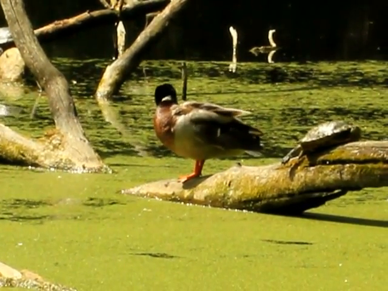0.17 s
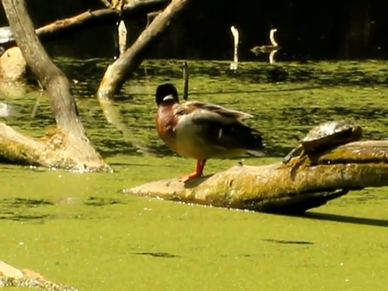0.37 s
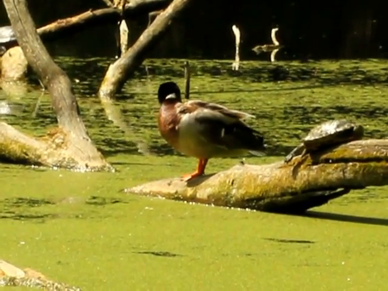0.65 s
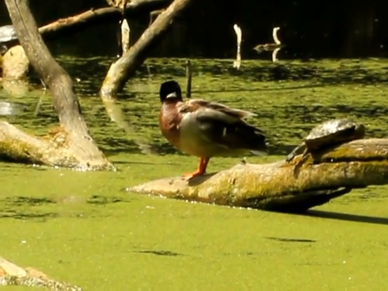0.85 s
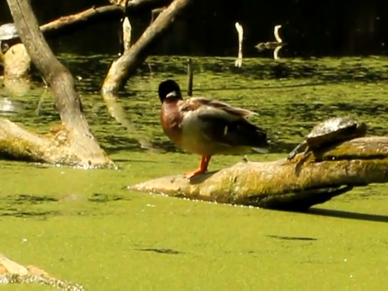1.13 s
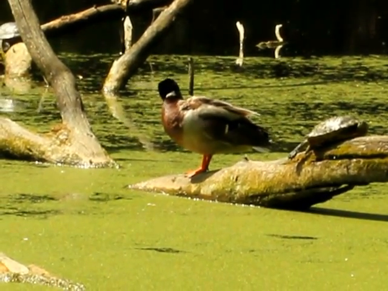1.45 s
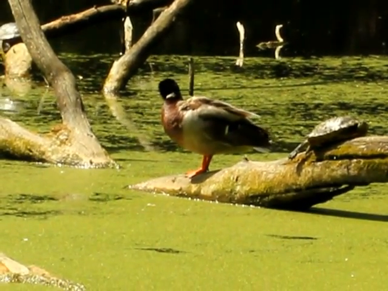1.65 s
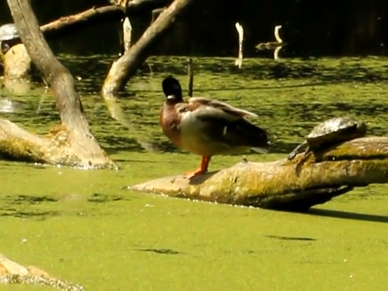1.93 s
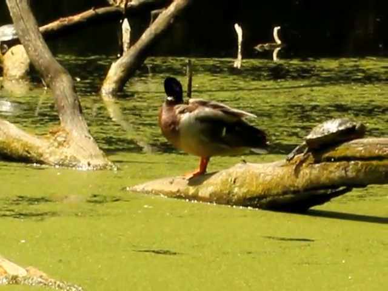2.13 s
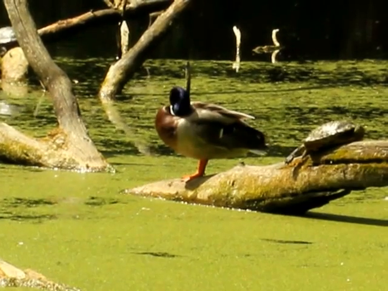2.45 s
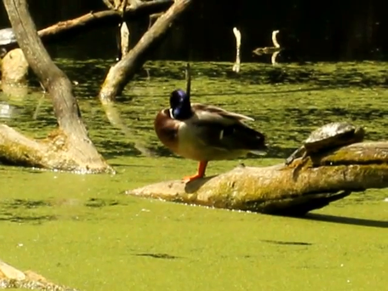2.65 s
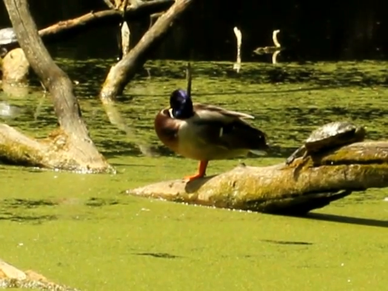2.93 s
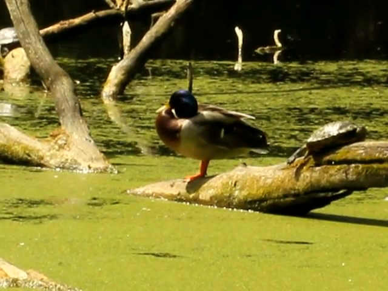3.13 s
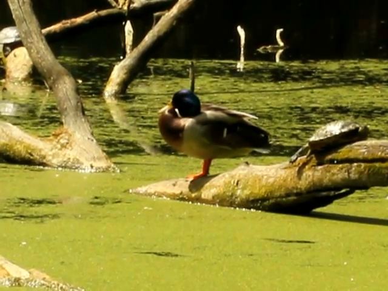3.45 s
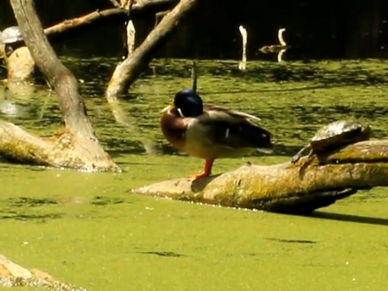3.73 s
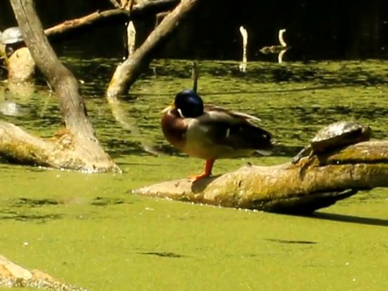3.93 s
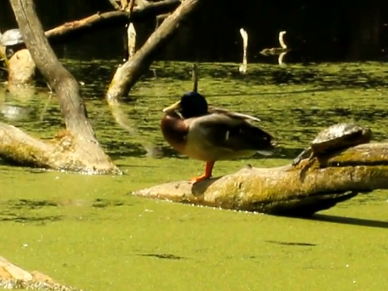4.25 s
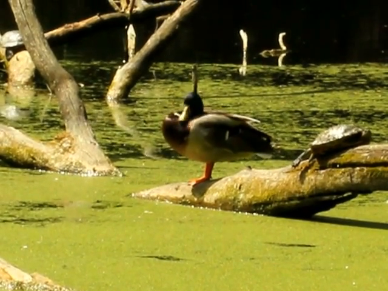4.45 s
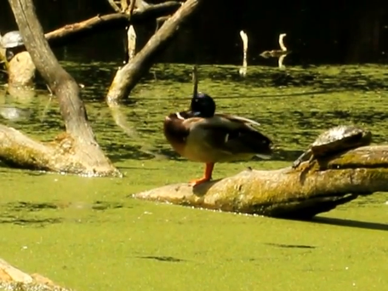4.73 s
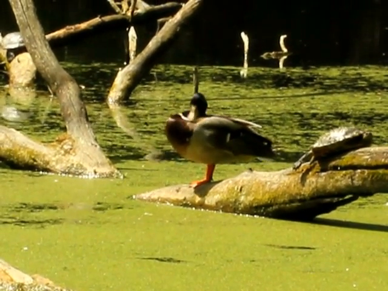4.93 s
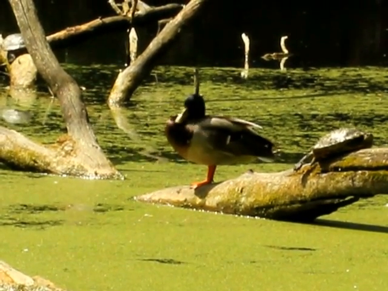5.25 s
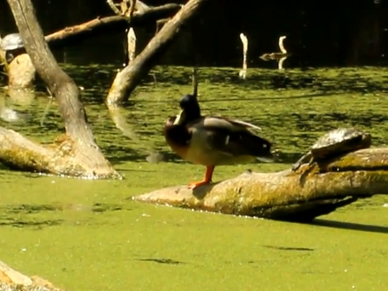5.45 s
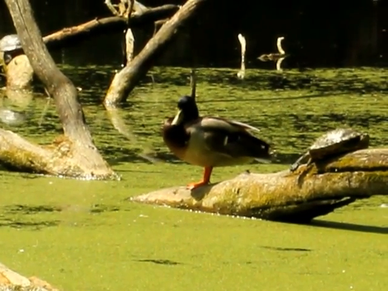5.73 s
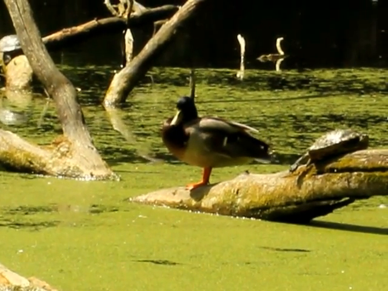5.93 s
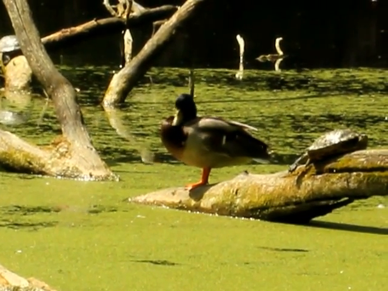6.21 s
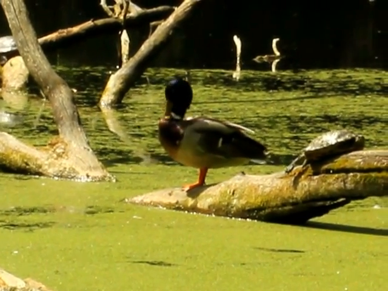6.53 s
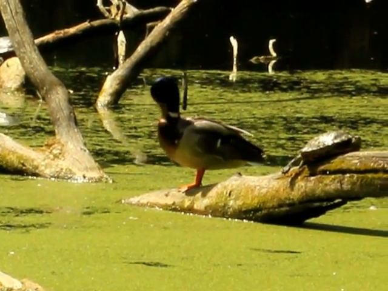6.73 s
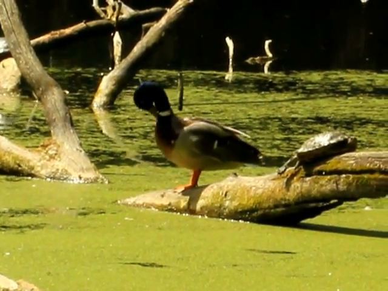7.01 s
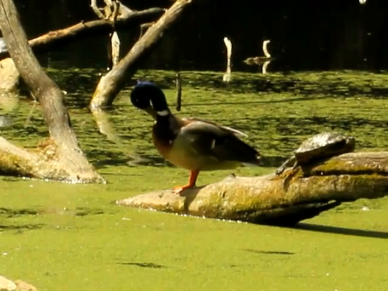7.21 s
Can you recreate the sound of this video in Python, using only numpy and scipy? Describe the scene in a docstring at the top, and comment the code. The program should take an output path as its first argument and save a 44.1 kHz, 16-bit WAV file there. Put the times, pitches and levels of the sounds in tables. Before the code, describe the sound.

A calm woodland pond with small birds singing in the trees, their notes trailing a light, diffuse echo. From 0 to 1.7 seconds, rapid chirps, slurs and thin high whistles crowd together, while soft, dull bumps knock the microphone. Similar short whistles sound at 1.9, 2.05 and, more softly, 2.2. It thins until about 3, with faint distant birds; a soft quick trill comes near 3.3. From 3.5 to 4.7 a lively run of buzzy, sliding and clear notes returns, with a few very faint bumps. It is sparse again from 5 to 6.7, then a thin, sinking whistle leads to bright chirps around 7.2. A short, nasal, falling call repeats near 1, 2.1, 3.3, 4.1, 5 and, duller, 6.3. From 1.4, high dry ticks with small rasps, perhaps an insect, recur every 0.6 seconds, strengthening. Faint air and a wavering low rumble lie underneath.

```python
"""Small songbirds whistle, chirp and trill around a woodland pond: sine tones follow gliding pitch curves.
One bird repeats a short, nasal, falling call, a stack of harmonics coloured by throat resonances.
Trunks and foliage echo every note: the sound is convolved with sparse reflections and a diffuse tail.
High rasps and ticks, perhaps an insect, are enveloped noise in a pattern about every 0.6 s.
Soft bumps reach the microphone as short low pulses, over filtered noise for air and a faint low rumble."""
import sys
import numpy as np
from scipy import signal
from scipy.fft import rfft, irfft, next_fast_len
from scipy.io import wavfile
from scipy.ndimage import map_coordinates

SR = 44100
rng = np.random.default_rng(int(sys.argv[2]) if len(sys.argv) > 2 else 0)


def log_audio(samples):
    """Write samples as a 16-bit WAV file to the path given in sys.argv[1]."""
    # one column per channel
    frames = np.atleast_2d(samples).T
    # limit to full scale, then quantise
    limited = np.clip(frames, -1, 1)
    pcm = np.round(limited * 32767).astype(np.int16)
    wavfile.write(sys.argv[1], SR, pcm)


N = 325017  # length in samples


def amp(db):
    """Level law: decibels become an amplitude ratio."""
    return 10 ** (np.asarray(db) / 20)


def unit(x):
    """Normalisation: scale a signal to rms 1."""
    return x / np.sqrt(np.mean(x ** 2) + 1e-20)


def along(points, hz):
    """Spectral interpolation: (Hz, value) points are joined on a logarithmic frequency axis."""
    point_hz, value = np.transpose(points)
    return np.interp(np.log(hz + 1), np.log(point_hz + 1), value)


def wobble(rate, size):
    """Random modulation: a smooth spline through rate random knots a second."""
    knots = rng.standard_normal(4096)
    return map_coordinates(knots, [np.arange(size) * rate / SR], mode="wrap")


def filtered(x, response):
    """Linear filtering: the spectrum is multiplied by a response of frequency."""
    m = next_fast_len(N + SR // 2)
    return irfft(rfft(x, m) * response(np.fft.rfftfreq(m, 1 / SR)), m)[:N]


def noise(spectrum):
    """Coloured noise: white noise is shaped by a spectrum and scaled to rms 1."""
    white = rng.standard_normal(N)
    return unit(filtered(white, lambda hz: amp(along(spectrum, hz))))


def add(track, s, sound):
    """Superposition: a sound is summed into the track at time s."""
    part = track[max(round(s * SR), 0):][:len(sound)]
    part += sound[:len(part)]


# Relative spectrum of the air noise: hz [Hz], density_db [dB per Hz]
AIR_SPECTRUM = [(15, -31.5), (25, -3.5), (69, 1.5), (113, 5), (227, -8), (349, -12.5), (1080, -3.5),
                (1490, -9), (1660, -9.5), (2170, -12), (3720, -8), (5430, -15), (9550, -19.5), (12800, -25),
                (15500, -21.5)]


def background(air_db=-68, rumble_db=-77, ebb_db=-7):
    """Broadband and low-frequency noise: still air and a far rumble that wavers and slowly ebbs."""
    rumble = noise([(25, -40), (80, 0.0), (150, 3.5), (220, -2), (330, -33.5), (600, -66.5)])  # (Hz, dB)
    ebb = ebb_db * np.linspace(-.5, .5, N)
    waver_db = 5.96 * wobble(6.5, N)
    return amp(air_db) * noise(AIR_SPECTRUM) + amp(rumble_db + ebb + waver_db) * rumble


# lighter random bumps: the span they fall in [s], their median-like level [dB] and pitch [Hz]
JOSTLE_S, JOSTLE_DB, JOSTLE_HZ = 1.3, -51, 113
# Firmer bumps on the microphone: start_s [s, at the centre], level_db [dB, envelope peak], pitch_hz [Hz]
FIRM_BUMPS = [(0.042, -38, 110), (0.137, -43, 99), (0.267, -36, 129), (.302, -43, 106), (.388, -45.5, 131),
              (0.423, -44, 113), (0.649, -38.5, 137), (0.858, -43, 118), (0.88, -46.5, 122.5),
              (1.431, -44, 93.5), (1.441, -41, 164), (1.447, -35.5, 100), (3.36, -50, 89),
              (3.7, -50.5, 138), (3.764, -46, 89), (3.783, -53.5, 136)]


def bumps(cycles=0.6, spread=0.22, uneven_db=4.0, count=14):
    """Gaussian pulses: each bump is a dull push of a cycle or two; lighter ones join the firm ones at first."""
    track = np.zeros(N)
    t = np.arange(-SR // 32, SR // 32) / SR
    light = []
    for i in range(count):
        s = JOSTLE_S * (i + rng.random()) / count
        db = JOSTLE_DB + uneven_db * rng.standard_normal()
        light.append((s, db, JOSTLE_HZ * np.exp(spread * rng.standard_normal())))
    for s, db, hz in [*FIRM_BUMPS, *light]:
        envelope = np.exp(-(t * hz / cycles) ** 2)
        push = np.sin(2 * np.pi * hz * t + rng.uniform(0, 2 * np.pi))
        add(track, s + t[0], amp(db) * envelope * push)
    return track


# leading rasp before the tick, closing rasp after it, half width of both [s]
LEAD_S, CLOSE_S, RASP_S = 0.098, 0.2966, .024
# soft hiss after each tick: delay [s], half width [s], level against the tick [dB]
HAZE_AFTER_S, HAZE_S, HAZE_DB = 0.15, 0.083, -27
# Relative spectrum of rasps and ticks: hz [Hz], level_db [dB]
RASP_SPECTRUM = [(2000, -23), (4000, -18.5), (6500, -6.5), (9000, 0), (13000, 4), (15500, 0)]
# Cycles of rasp, tick, rasp: start_s [s, at the tick], tick_db [dB], leading_rasp_db [dB], closing_rasp_db [dB]
TICK_CYCLES = [(1.373, -58.5, -73.5, -78), (1.987, -50.5, -67.5, -66.5), (2.611, -48.5, -64.5, -65),
               (3.21, -46, -60, -64.5), (3.817, -44, -60, -66), (4.442, -44.5, -57, -66.5),
               (5.074, -41, -56, -59.5), (5.713, -39, -53.5, -60.5), (6.308, -40, -54.5, -58.5),
               (6.919, -39.5, -53, -54)]


def rasps(rise=0.0073, fall=0.004, grain_db=3.5):
    """Amplitude-modulated noise: grainy scrapes swell around ticks that build up quickly and stop short."""
    t, power = np.arange(N) / SR, np.zeros(N)
    for s, tick_db, lead_db, close_db in TICK_CYCLES:
        from_tick = np.maximum((s - t) / rise, (t - s) / fall)
        power += amp(2 * tick_db) * np.exp(-2 * np.minimum(from_tick, 20))
        scrapes = [(-LEAD_S, RASP_S, lead_db),
                   (HAZE_AFTER_S, HAZE_S, tick_db + HAZE_DB),
                   (CLOSE_S, RASP_S, close_db)]
        for after, width, db in scrapes:
            spread = ((t - s - after) / width) ** 2
            power += amp(2 * db) * np.exp(-np.minimum(spread * 2, 20))
    grain = amp(grain_db * wobble(520, N))
    return np.sqrt(power) * unit(noise(RASP_SPECTRUM) * grain)


# Decay of the wood's diffuse tail: hz [Hz], t60_s [s, time to fall 60 dB]
WOOD_DECAY = [(200, 0.42), (900, 1.42), (2000, 1.01), (4000, 0.98), (6000, 0.62), (9000, 0.47),
              (15000, .25)]


def woodland(x, near_db=-9, far_db=-13, near_t60=0.23, gap=0.0072):
    """Reverberation: near trunks return separate echoes; the wood behind answers with a long diffuse tail."""
    t = np.arange(SR) / SR
    hz, frames, z = signal.stft(rng.standard_normal(SR), SR, nperseg=256)
    decay = amp(-60 * frames / along(WOOD_DECAY, hz)[:, None])
    far = signal.istft(z * decay, SR, nperseg=256)[1][:SR]
    far = far * (1 - np.exp(-t / 0.02))
    trunks = rng.standard_normal(SR) * (rng.random(SR) < 400 / SR)  # about 400 reflections a second
    near = trunks * amp(-60 * t / near_t60) * (1 - np.exp(-(t / gap) ** 2))
    answer = amp(near_db) * near / np.linalg.norm(near) + amp(far_db) * far / np.linalg.norm(far)
    return signal.fftconvolve(x, answer)[:N]


def bank(x, delay=0.03, db=-8):
    """Specular reflection: the bank of the pond returns one clear echo."""
    return amp(db) * np.pad(x, (int(delay * SR), 0))[:N]


def through_leaves(note, echo_db, spread=0.037, half_db=4):
    """Multipath scattering: the deeper a bird sits in foliage, the more of its note takes many short paths."""
    t = np.arange(int(spread * SR)) / SR
    paths = rng.standard_normal(len(t)) * amp(-22 * t / spread)
    share = 1 / (1 + amp(1.8 * (half_db - echo_db)))  # scattered share of the energy
    paths *= np.sqrt(share) / np.linalg.norm(paths)
    paths[0] += np.sqrt(1 - share)
    smeared = signal.fftconvolve(note, paths)
    return smeared * np.linalg.norm(note) / np.linalg.norm(smeared)  # the note's energy is kept


def swell(size, edge):
    """Tapered envelope: rms 1, with rounded edges up to edge seconds long."""
    return unit(signal.windows.tukey(size, min(2 * edge * SR / size, 1)))


# Throat resonances: hz [Hz], gain_db [dB]
THROAT_GAIN = [(850, -8.5), (1700, -1), (2650, -5.5), (3600, -4), (4500, -13), (6300, -16), (7200, -23.5),
               (9000, -25), (11000, -44)]
# Repeated call: start_s [s], length_s [s], start_hz [Hz], end_hz [Hz], level_db [dB, before the throat's gain],
# tilt_db [dB per octave, above the second harmonic]
NASAL_CALLS = [(0.0, 0.077, 858, 799, -56, -18), (0.975, 0.06, 883.3, 802, -36, -7.5),
               (2.06, 0.071, 896, 803.6, -36.5, -2), (3.326, 0.047, 894.4, 792, -39, -16.5),
               (4.098, 0.0553, 883.6, 784, -40.5, -9), (5.041, 0.071, 910, 799, -35, 2),
               (6.261, 0.025, 839, 815, -43, -36)]


def caller(edge=0.013, jitter=0.0033, fade_db=40, uneven_db=2.0):
    """Source and filter: throat-coloured harmonics hold their pitch, then sag and dull as the pressure drops."""
    calls, k = np.zeros(N), np.arange(1, 13)[:, None]  # k numbers the harmonics
    for s, length, start, end, db, tilt_db in NASAL_CALLS:
        u = np.linspace(0, 1, int(length * SR))
        slack = np.sin(np.pi / 2 * u ** 1.7) ** 2
        hz = (start + (end - start) * slack) * (1 + jitter * wobble(218, len(u)))
        upper_db = tilt_db * np.log2(k / 2) - fade_db * slack + uneven_db * rng.standard_normal(k.shape)
        gains = amp(along(THROAT_GAIN, k * hz) + upper_db * (k > 2))
        harmonics = np.sin(2 * np.pi * k * np.cumsum(hz) / SR)
        voice = np.sum(gains * harmonics, axis=0)
        add(calls, s, amp(db) * swell(len(u), edge) * voice)
    return calls


def tone(hz, flutter, edge):
    """Frequency modulation: one note of about rms 1 follows a pitch curve; a fluttering syrinx makes it buzz."""
    phase = 2 * np.pi * np.cumsum(hz * (1 + flutter * wobble(325.0, len(hz)))) / SR
    return swell(len(hz), edge) * unit(np.sin(phase) + amp(-53) * np.sin(2 * phase))


SWELL_SHARE = 0.28  # share of a note's length spent on each fade, held within 11 to 30 ms


def whistle(length, start, middle, end, flutter):
    """Parabolic glide: pitch follows an arc through three points, and longer notes tend to swell more gently."""
    u = np.linspace(0, 1, int(length * SR))
    arc = np.polyfit([0, .5, 1], [start, middle, end], 2)
    edge = np.clip(SWELL_SHARE * length, .011, .03)
    return tone(np.polyval(arc, u), flutter, edge)


def arch(length, hz, droop, flutter):
    """Symmetric glide: a note rises to its pitch and sinks back."""
    return whistle(length, hz * (1 - droop), hz, hz * (1 - droop), flutter)


SLUR_EASE = .36  # share of the glide left at half time


def slur(length, start, end, flutter):
    """Decelerating glide: the pitch slows as it nears its last value."""
    return whistle(length, start, end + SLUR_EASE * (start - end), end, flutter)


# time to reach the held pitch [s]; waver as a share of the pitch; level where the flick starts [dB]
FLICK_S, HOOK_FLUTTER, FLICK_DB = .014, 0.0054, -11


def hook(length, start, held):
    """Pitch transient: the note snaps to a held pitch, and the flick is softer than the hold."""
    left = np.maximum(1 - np.arange(int(length * SR)) / SR / FLICK_S, 0)
    return tone(held + (start - held) * left ** 2, HOOK_FLUTTER, edge=0.0066) * amp(FLICK_DB * left)


def far_birds(low_hz=2900, high_hz=4600, db=-80, count=80):
    """Reverberant field: faint whistles from deep in the wood, to be heard only by their echoes."""
    chorus = np.zeros(N)
    for when, pitch, glide, size in rng.random((count, 4)):
        hz = low_hz + pitch * (high_hz - low_hz)
        bend = .12 * (glide - .5)
        note = whistle(0.074, hz * (1 + bend), hz, hz * (1 - bend), 0.012)
        add(chorus, when * N / SR, amp(db + 10.3 * size) * note)
    return chorus


def trill(start=3.245, step=0.068, hz=4220, db=-62, count=7, echo_db=6):
    """Periodic repetition: a quick run of like chips, falling at the end and blurred by the leaves."""
    run = np.zeros(N)
    for i in range(count):
        chip = whistle(0.018, hz * 0.95, hz, hz * 0.9, 0.011)
        add(run, start + i * step, amp(db + rng.normal(0, 2.1)) * through_leaves(chip, echo_db))
    return run


# In the note tables below, level_db is the rms level of the note and echo_db the gain of its part sent to the trees.

# shares of the pitch: how far above it the note starts, how much it wavers
WHISTLE_SAG, WHISTLE_FLUTTER = 0.014, 0.0053
# Level whistles: start_s [s], length_s [s], pitch_hz [Hz], level_db [dB], echo_db [dB]
LEVEL_WHISTLES = [(.01, 0.074, 4090, -57, 8), (0.149, 0.096, 8420, -59.5, 5.5),
                  (0.373, 0.026, 3684, -38.5, 6), (0.463, 0.069, 2970, -50.5, 16.5),
                  (0.542, 0.086, 2859, -45, 7.5), (0.607, 0.12, 6804, -60.5, 5), (0.843, .14, 3270, -46, 7),
                  (.911, 0.054, 8100, -51.5, 1), (.994, 0.046, 8080, -38.5, 3),
                  (1.05, 0.055, 8180, -47.5, 4.5), (1.064, 0.058, 4350, -53, -2),
                  (1.145, 0.05, 4438, -56, 13), (1.246, 0.023, 4046, -32.5, -5),
                  (1.29, 0.029, 3926, -39, -2), (1.376, 0.037, 2508, -54.5, 3),
                  (1.586, 0.052, 4393, -47, -3), (1.676, 0.037, 4390, -50.5, 0), (1.7, 0.12, 2100, -63, -9),
                  (2.229, 0.044, 2840, -61.5, 2.5), (2.38, .16, 3466, -61, 6.5),
                  (2.536, 0.055, 4365, -68.5, 5), (3.227, 0.2, 3152, -69.5, 17),
                  (3.345, 0.08, 3730, -64, 6.5), (3.467, 0.074, 2592, -71, 21),
                  (4.135, 0.099, 2990, -43.5, -1), (4.464, 0.111, 4090, -34, 3),
                  (4.594, 0.068, 4004, -49.5, -4), (4.6, .12, 3763, -59.5, 11),
                  (6.095, 0.022, 4110, -69, 8), (6.334, 0.15, 3770, -72.5, 0), (6.345, .074, 4830, -79, 4),
                  (6.375, 0.047, 2880, -73.5, -2), (6.594, 0.072, 3770, -66, 4.5),
                  (6.998, 0.08, 4370, -60.5, -2), (7.076, 0.05, 8500, -62.5, 11.5),
                  (7.185, 0.064, 4104, -29.5, 1), (7.291, 0.038, 3588, -36.5, 2),
                  (7.333, 0.2, 3578, -49, 24)]


def level_whistles():
    """Near-steady tones: whistles that sag a little in pitch."""
    for s, length, hz, db, echo_db in LEVEL_WHISTLES:
        start, end = hz * (1 + WHISTLE_SAG), hz * (1 - WHISTLE_SAG / 2)
        yield s, whistle(length, start, hz, end, WHISTLE_FLUTTER), db, echo_db


SLUR_FLUTTER = 0.013  # waver as a share of the pitch
# Slurs: start_s [s], length_s [s], start_hz [Hz], end_hz [Hz], level_db [dB], echo_db [dB]
SLURRED_NOTES = [(0.032, 0.012, 3650, 3275, -47, 4.5), (0.101, 0.017, 3587, 3170, -53, 4.5),
                 (.132, 0.028, 8460, 7360, -45.5, 0), (.2, 0.015, 5020, 7550, -46.5, -8),
                 (0.364, 0.0083, 4760, 4700, -39.5, -1), (.368, 0.026, 4260, 3806, -35, -1.5),
                 (0.436, 0.032, 3870, 3135, -38, -5), (.818, 0.043, 4200, 3170, -53, 4.5),
                 (1.253, 0.031, 3630, 3020, -44.5, 5), (1.3, 0.034, 3060, 2624, -52.5, 4),
                 (1.362, 0.018, 4040, 3600, -36.5, -1), (1.424, 0.038, 3800, 3420, -47, 8),
                 (1.453, 0.0333, 3615, 3207, -35, -3.5), (1.518, 0.02, 3780, 3350, -47, 3),
                 (1.52, .056, 4720, 4270, -63, -1), (1.593, 0.034, 3420, 2880, -43, 1),
                 (1.67, 0.024, 3150, 2560, -53.5, -6), (2.623, 0.09, 5460, 5020, -70.5, 7),
                 (2.745, .091, 8300, 7880, -69.5, 4), (2.795, 0.12, 3905, 3510, -62, 10),
                 (2.826, .14, 4520, 4050, -69, 6), (2.977, 0.052, 3245, 2670, -58.5, 5),
                 (3.185, .053, 2620, 2850, -62, 3), (3.298, 0.048, 8320, 7260, -55, 3.5),
                 (3.464, 0.075, 8290, 7280, -54.5, 6), (3.506, .072, 7000, 6335, -46.5, 4.5),
                 (3.609, 0.026, 7100, 4700, -41.5, 0.5), (3.827, .088, 5157, 4417, -34.5, -3),
                 (3.985, 0.043, 3950, 2436, -46, 7), (4.102, 0.048, 2240, 3180, -44.5, 1),
                 (4.233, 0.027, 6900, 7700, -57, 8), (4.357, 0.017, 3710, 6430, -45, 4),
                 (4.413, 0.0599, 3804, 4127, -31.5, 3.5), (4.562, .035, 3690, 2660, -50.5, 4),
                 (6.194, 0.022, 3690, 3400, -61.5, 2.5), (6.46, .27, 2350, 2214, -75.5, 2),
                 (6.775, 0.058, 4530, 3840, -67, 7), (6.806, 0.055, 5050, 4555, -55, 4.5),
                 (6.946, .045, 4580, 3710, -45, -1)]


def slurred_notes():
    """Frequency sweeps: notes glide fast, then ease into their last pitch."""
    for s, length, start, end, db, echo_db in SLURRED_NOTES:
        yield s, slur(length, start, end, SLUR_FLUTTER), db, echo_db


# Hooks: start_s [s], length_s [s], start_hz [Hz], held_hz [Hz], level_db [dB, before the flick softens],
# echo_db [dB]
HOOKED_NOTES = [(0.08, 0.055, 6720, 8260, -51, 13), (0.201, 0.062, 7350, 6410, -49, 1.5),
                (.281, 0.062, 4320, 5858, -30, -3), (0.847, 0.081, 6990, 8136, -41.5, 4),
                (3.738, 0.069, 4310, 6214, -43.5, 3), (4.259, 0.044, 8100, 4813, -34.5, 4.5)]


def hooked_notes():
    """Onset sweeps: a flick into a held note."""
    for s, length, start, held, db, echo_db in HOOKED_NOTES:
        yield s, hook(length, start, held), db, echo_db


# waver and hang of the ends as shares of the pitch; echo [dB]
BUZZ_FLUTTER, BUZZ_DROOP, BUZZ_ECHO_DB = .052, 0.059, 1
# Buzzes: start_s [s], length_s [s], pitch_hz [Hz], level_db [dB]
BUZZING_NOTES = [(0.199, 0.045, 1994, -63.5), (.955, 0.038, 8780, -60), (1.086, 0.1, 8510, -57),
                 (3.046, 0.022, 4620, -50.5), (3.623, 0.043, 4276, -43), (3.736, 0.074, 5130, -49.5),
                 (3.872, 0.068, 4450, -42), (3.965, 0.057, 3754, -35.5), (4.333, 0.034, 3370, -44.5),
                 (6.834, .03, 4700, -59), (6.849, 0.07, 4960, -63), (6.965, 0.027, 4040, -49.5)]


def buzzing_notes():
    """Deep random frequency modulation: strong flutter makes arched notes rough."""
    for s, length, hz, db in BUZZING_NOTES:
        yield s, arch(length, hz, BUZZ_DROOP, BUZZ_FLUTTER), db, BUZZ_ECHO_DB


ARCH_FLUTTER = 0.0039  # waver as a share of the pitch
# Arches: start_s [s], length_s [s], top_hz [Hz], droop [share of top_hz the ends hang below it],
# level_db [dB], echo_db [dB]
ARCHED_NOTES = [(1.899, 0.067, 4047, 0.0348, -35.5, -2.5), (2.044, 0.0657, 4037, 0.0492, -34.5, -2),
                (2.188, 0.056, 4034, 0.017, -45, -6), (2.914, 0.049, 8350, 0.26, -66, -2),
                (3.002, .06, 7690, 0.34, -65, 5.5), (3.04, .04, 2278, 0.19, -52, -7),
                (3.13, 0.063, 7630, 0.1, -60, -2), (3.255, 0.052, 8360, 0.12, -62, 8),
                (6.987, .035, 7900, 0.14, -60, 2), (7.117, 0.034, 7930, .2, -55.5, -3),
                (7.236, 0.042, 7580, 0.23, -48, -3.5)]


def arched_notes():
    """Symmetric sweeps: notes that rise and sink back."""
    for s, length, hz, droop, db, echo_db in ARCHED_NOTES:
        yield s, arch(length, hz, droop, ARCH_FLUTTER), db, echo_db


# Long, thin whistle: start_s [s], length_s [s], start_hz [Hz], end_hz [Hz], level_db [dB], echo_db [dB]
SINKING_WHISTLE = [(6.656, 0.45, 8974, 8290, -61.5, 0)]


def sinking_whistle():
    """Slow downward sweep: one long, thin whistle."""
    for s, length, start, end, db, echo_db in SINKING_WHISTLE:
        yield s, slur(length, start, end, ARCH_FLUTTER), db, echo_db


def songbirds():
    """Direct and scattered sound: the song straight from the branch, and the part that goes into the trees."""
    direct, scattered = np.zeros((2, N))
    kinds = [level_whistles, slurred_notes, hooked_notes, buzzing_notes, arched_notes, sinking_whistle]
    for kind in kinds:
        for s, sound, db, echo_db in kind():
            note = amp(db) * sound
            add(direct, s, through_leaves(note, echo_db))
            add(scattered, s, amp(echo_db) * note)
    return direct, scattered


def scene():
    """Superposition of sources: birds sing among the trees; the rasps and bumps are close by."""
    song, scattered = songbirds()
    calls, scrapes, chips = caller(), rasps(), trill()
    song_echo = woodland(scattered + chips + far_birds() + amp(-7.5) * scrapes)
    call_echo = bank(calls) + woodland(calls, near_db=-7.5, far_db=-14.5, near_t60=0.14, gap=0.013)
    birds = song + chips + calls + song_echo + call_echo
    return (birds + scrapes + bumps() + background())[None]


TOP_HZ = 15800  # upper band limit


def record(dry, low_cut_hz=42):
    """Band limiting: the recorder rolls off the deepest bass and keeps nothing above its band limit."""
    def response(hz):
        """Second-order high-pass magnitude with a sharp upper edge."""
        return (hz < TOP_HZ) * hz ** 2 / np.hypot(hz ** 2, low_cut_hz ** 2)
    return filtered(dry[0], response)[None]


dry = scene()
out = record(dry)
log_audio(out)
```